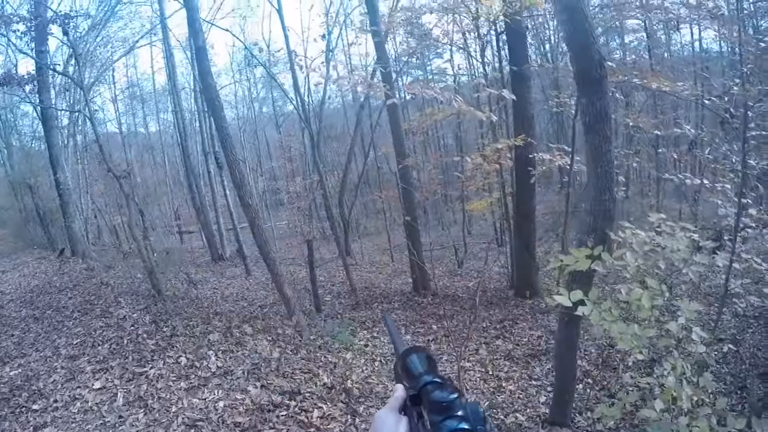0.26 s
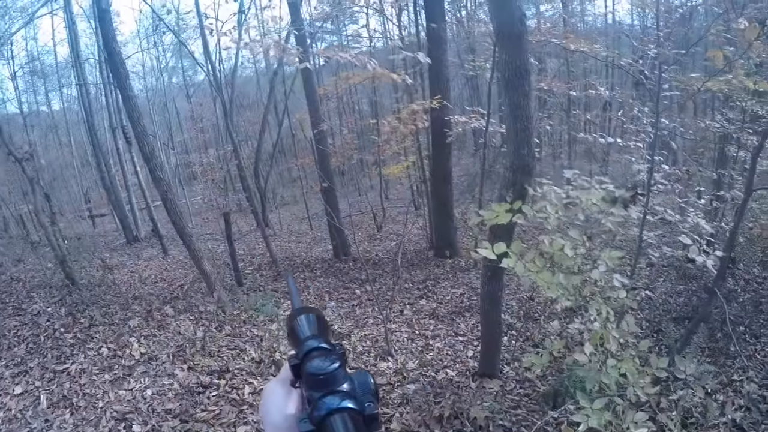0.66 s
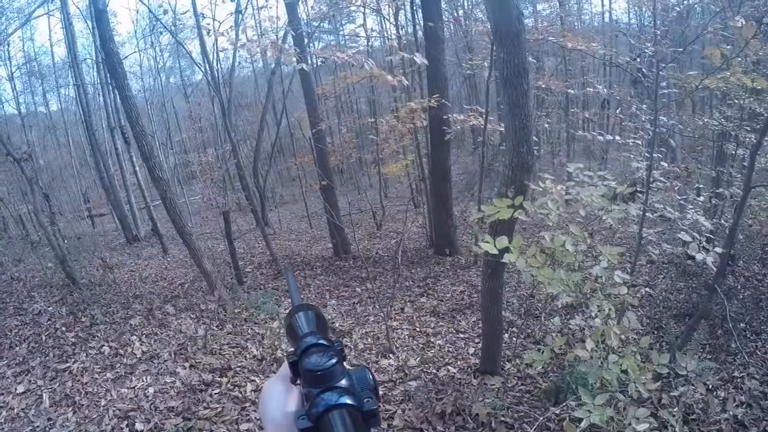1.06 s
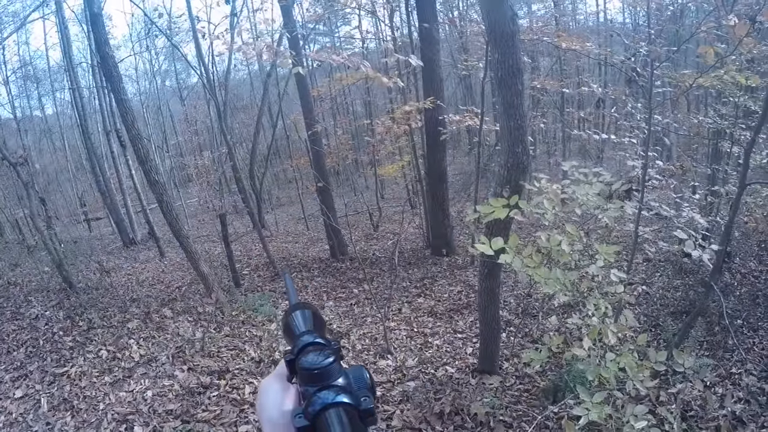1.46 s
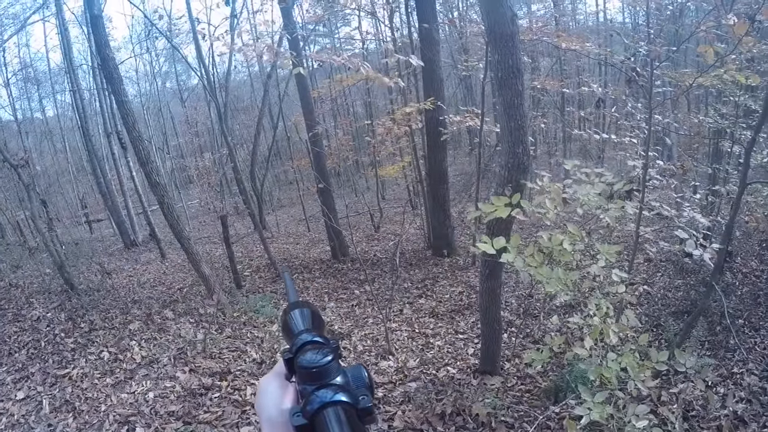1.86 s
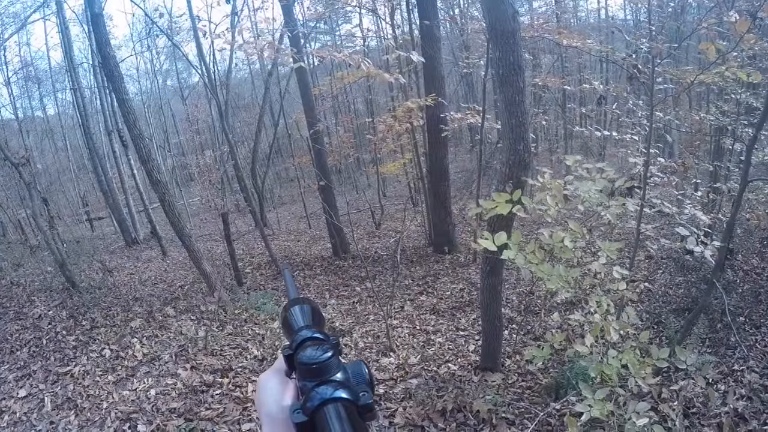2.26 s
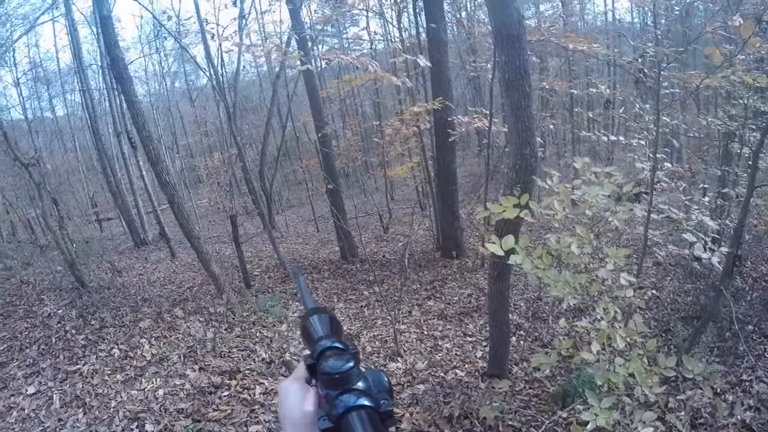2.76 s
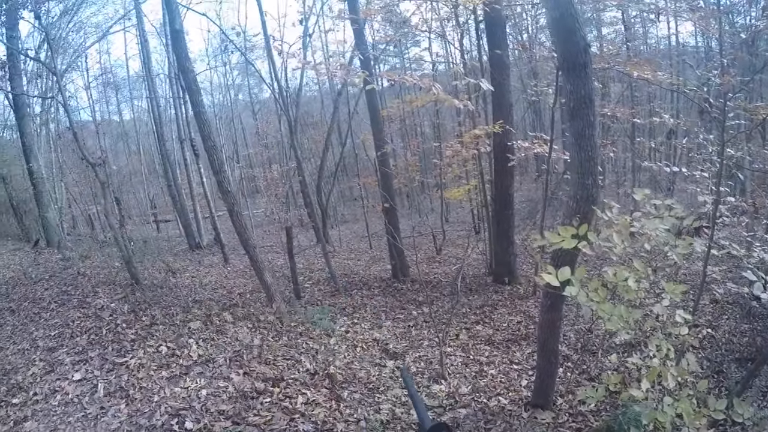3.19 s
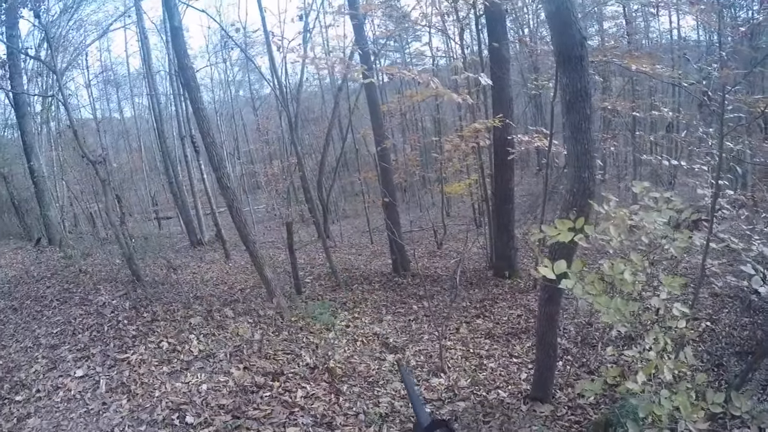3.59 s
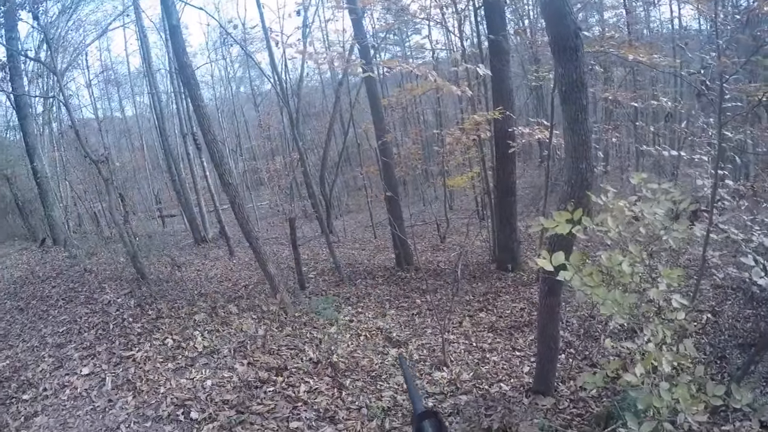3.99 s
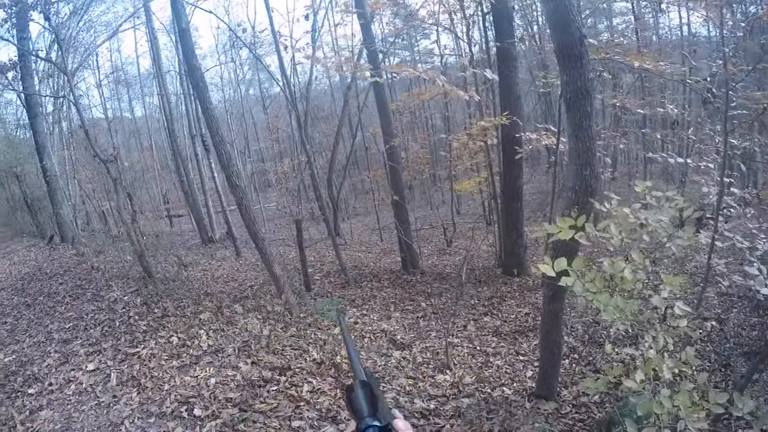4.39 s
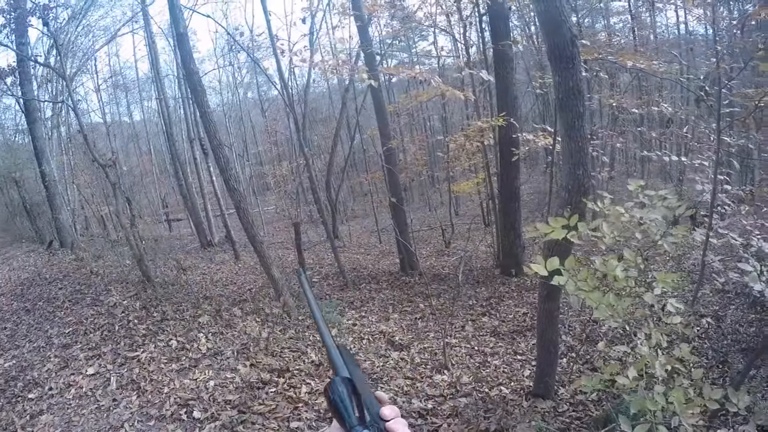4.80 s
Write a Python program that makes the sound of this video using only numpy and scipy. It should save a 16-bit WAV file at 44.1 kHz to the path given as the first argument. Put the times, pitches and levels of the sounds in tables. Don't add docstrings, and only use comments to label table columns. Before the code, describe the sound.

The first two seconds are quiet: low, lumpy wind rumble, a faint far drone and thin hiss, heard through a small boxed microphone worn close to the shooter. Sleeves rub softly and loose fittings tick; at 0.35 s a safety catch snaps crisply, with more cloth and a tick around 0.6 s. At about 2.37 s a single rifle shot bursts out, a hard, distorted crack and thump. Sharp echoes clatter off nearby trunks for a few tenths of a second, blending into a roll from distant slopes that dulls and fades beyond 3.7 s. The background ducks after the shot, then climbs back. A small tick at 3.7 s leads to the bolt handle clacking up at 3.86 s. The bolt scrapes back and strikes its stop at 4.11 s with a sleeve rustle. A brass case taps faintly at 4.22 and 4.28 s. Wind gusts and a clearer fitting tick come near 4.9 s.

```python
import sys
import numpy as np
from scipy import signal
from scipy.fft import rfft, irfft, next_fast_len
from scipy.io import wavfile

SR = 44100
rng = np.random.default_rng(int(sys.argv[2]) if len(sys.argv) > 2 else 0)


def int16_out(signal):
    q = np.round(np.clip(np.atleast_2d(signal).T, -1, 1) * 32767)
    wavfile.write(sys.argv[1], SR, q.astype(np.int16))


def undo_db(level):
    steps = np.asarray(level, float) / 20
    return 10 ** steps


N = 222616
TIME = np.arange(N) / SR
SHOT_S = 2.378
AFTER = np.maximum(TIME - SHOT_S, 0)


def rms_one(x):
    return x / np.sqrt(np.mean(x ** 2) + 1e-20)


def low_pass(x, hz, order):
    return signal.sosfilt(signal.butter(order, hz, fs=SR, output="sos"), x)


def level_curve(rows):
    s, db = np.transpose(rows)
    return np.interp(TIME, s, db)


def at_hz(points, hz, axis=1):
    return np.interp(np.log(hz), np.log(np.array(points)[:, 0]), np.array(points)[:, axis])


def drift(rate):
    r = np.exp(-80 * np.pi * rate / SR)
    noise = rng.standard_normal(N // 40 + 2002)
    slow = signal.lfilter([1], [1, -2 * r, r * r], noise)[2000:]
    return np.interp(np.arange(N) / 40, np.arange(len(slow)), rms_one(slow))


def bands(spectrum, low_hz, high_hz):
    size = next_fast_len(N + 8000)
    colour = undo_db(at_hz(spectrum, np.arange(1, size // 2 + 2) * SR / size))
    noise = irfft(rfft(rng.standard_normal((2, size))) * colour, size)
    edges = low_hz * 2 ** np.arange(0, np.log2(high_hz / low_hz), 1 / 3)
    for k, (low, high) in enumerate(zip(edges, edges[1:])):
        band = signal.butter(2, [low, high], "band", fs=SR, output="sos")
        yield np.sqrt(low * high), signal.sosfilt(band, noise[k % 2])[-N:]


def coloured(spectrum, low_hz, high_hz, patchy_db, rate):
    together = drift(rate / 4)
    total = 0
    for _, band in bands(spectrum, low_hz, high_hz):
        total = total + undo_db(patchy_db * (together + drift(rate))) * band
    return rms_one(total)


# frequency in Hz, width in Hz, level in dB.
PORT = [(423, 300, -17.5), (1010, 240, -5.5), (1680, 420, -5), (2900, 730, -1.5), (4200, 1600, -3.5),
        (5160, 290, -3.5), (6300, 440, -5), (10000, 2100, -18.5), (14300, 5700, -16.5)]


def bursts(rows, first_db, tail_db, tail_t60, own_db, own_width):
    out, t = np.zeros(N), np.arange(int(.2 * SR)) / SR
    for s, peak_db, t60, rise, tilt_db, own_hz in rows:
        decay = undo_db(-60 * t / t60) + undo_db(tail_db - 60 * t / tail_t60)
        spray = rng.standard_normal(len(t)) * (1 - np.exp(-t / rise)) * decay
        spray[round(rise * SR)] += undo_db(first_db) * np.exp(-rise / .0008)
        rung = 0
        for k, (hz, width_hz, level_db) in enumerate(PORT + [(own_hz, own_width * own_hz, own_db)]):
            r, w = np.exp(-np.pi * width_hz / SR), 2 * np.pi * hz / SR
            gain = undo_db(level_db + tilt_db * np.log2(hz / 4000))
            zeros, poles = [(1 - r * r) / 2, 0, (r * r - 1) / 2], [1, -2 * r * np.cos(w), r * r]
            rung = rung + (-1) ** k * gain * signal.lfilter(zeros, poles, spray)
        at = round(s * SR)
        out[at:at + len(t)] += (undo_db(peak_db) * rung / np.abs(rung).max())[:N - at]
    return out


def struck(rows, rise, tilt_db):
    return [(s, peak_db, t60, rise * t60, tilt_db, hz) for s, peak_db, t60, hz in rows]


def metal(rows, tilt_db):
    contacts = struck(rows, .03, tilt_db)
    return bursts(contacts, first_db=15, tail_db=-42.5, tail_t60=.23, own_db=7.5, own_width=.16)


# frequency in Hz, density in dB per Hz.
WIND = [(7.1, -32), (12, 2.5), (33, 1.5), (68, -12.5), (98, -16), (134, -30.5), (200, -28.5), (260, -51.5),
        (440, -120)]
# time in seconds, level in dB.
GUSTS = [(0, -54), (.4, -56.5), (.6, -50), (1.1, -55), (1.7, -57), (2.1, -55), (2.25, -46.5), (2.36, -52.5),
         (2.9, -57), (3.3, -57), (3.65, -47.5), (4.1, -49), (4.27, -45.5), (4.5, -53.5), (4.85, -41),
         (5.05, -46.5)]


def wind():
    return undo_db(level_curve(GUSTS)) * coloured(WIND, 14, 220, patchy_db=-.56, rate=6.9)


# frequency in Hz, density in dB per Hz.
DRONE = [(59, -31), (100, 0.5), (215, -1), (347, -0.5), (435, -3.5), (479, -2.5), (550, -11), (800, -23),
         (1040, -50.5), (1760, -120)]
# time in seconds, level in dB.
SWELL = [(0, -59.5), (.6, -63.5), (1.0, -59.5), (1.3, -66), (1.7, -63), (2.3, -64), (3.6, -58.5),
         (5.05, -63)]


def drone():
    return undo_db(level_curve(SWELL)) * coloured(DRONE, 100, 900, patchy_db=1.2, rate=5.0)


# frequency in Hz, density in dB per Hz.
HISS = [(450, -30), (600, -9), (1200, -12.5), (2100, -13), (2700, -8.5), (3400, -12.5), (5300, -14.5),
        (6700, -17.5), (7600, -20.5), (12000, -25), (15200, -28), (15500, -62)]


def hiss():
    return undo_db(-63) * coloured(HISS, 400, 19000, patchy_db=.53, rate=14.0)


def background():
    duck_db, dive_s, climb_s = 16, .14, .59
    recovery = np.exp(-(np.maximum(AFTER - dive_s, 0) / climb_s) ** 2)
    gain_db = -duck_db * np.minimum(AFTER / dive_s, 1) * recovery
    return undo_db(gain_db) * (wind() + drone() + hiss())


# peak time in seconds, level in dB, swell in dB per second, fade in dB per second.
CLOTH = [
    (0, -63, 100, 198),
    (.13, -63, 43, 77),
    (.515, -62.5, 94, 57),
    (.6, -61.5, 61, 150),
    (4.13, -55, 904, 94.5),
    (4.35, -65, 30, 37),
    (4.93, -65.5, 68.5, 8),
]


def cloth():
    level = 0
    for s, db, swell, fade in CLOTH:
        level = level + undo_db(db - np.where(TIME < s, swell * (s - TIME), fade * (TIME - s)))
    colour = [(500, 3.5), (1200, -5), (2300, -2), (3600, -4), (5200, -2), (6600, -5.5), (8000, -16.5),
              (15200, -15.5), (15500, -48.5)]
    return level * undo_db(.9 * drift(80)) * coloured(colour, 500, 16500, patchy_db=.5, rate=20.0)


# start in seconds, peak in dB, t60 in seconds, own ring in Hz.
TICKS = [(.094, -47.5, .02, 2290), (.1826, -39.5, 0.0094, 5760), (.197, -46, .016, 6000),
         (.5991, -39, 0.0068, 2520), (.893, -55.5, .015, 9500), (3.7031, -29, 0.02, 5295),
         (4.0029, -37, 0.035, 2240), (4.5482, -39.5, .02, 5140), (4.9083, -23.5, 0.01302, 4300),
         (4.9105, -38, 0.075, 4080), (4.922, -34, 0.02, 6060)]


def loose_ticks():
    return metal(TICKS, tilt_db=-2.5)


# start in seconds, peak in dB, t60 in seconds, own ring in Hz.
CATCH = [
    (.3185, -35, 0.0128, 5650),
    (.3496, -3, 0.0065, 6300),
    (.3506, -18, 0.013, 4750),
    (.3585, -34, 0.004, 7200),
]


def safety_catch():
    return metal(CATCH, tilt_db=3.5)


# start in seconds, peak in dB, pitch in Hz, t60 in seconds.
KNOCKS = [(.32, -46, 150, .04), (.35, -40, 420, .025), (2.3685, -15, 250, .02), (2.3803, -14, 420, .04),
          (2.3817, -12, 285, .035), (2.384, -22, 120, .12), (2.3885, -18, 230, .05), (2.407, -17, 185, .05),
          (2.472, -24, 400, .03), (2.473, -26, 190, .04), (3.858, -21, 430, .045), (3.862, -33, 150, .06),
          (3.868, -29, 70, .095), (4.11, -25, 390, .05), (4.111, -29, 140, .07), (4.2245, -35, 5300, .019),
          (4.277, -35, 5300, .035)]


def knocks():
    out = np.zeros(N)
    for s, peak_db, hz, t60 in KNOCKS:
        t = np.maximum(TIME - s, 0)
        out += undo_db(peak_db - 60 * t / t60) * np.sin(2 * np.pi * hz * t)
    return out


# start in seconds, peak in dB, t60 in seconds, own ring in Hz.
CRACKS = [
    (2.364, -22, .04, 3000),
    (2.3663, -8, .02, 7000),
    (2.3679, 0, .012, 2800),
    (2.3704, 9, .03, 6200),
    (2.3776, 10, .005, 6000),
    (2.3795, -5, .05, 5300),
]
# time in seconds, gain in dB.
DEAF = [(2.3729, 0), (2.3736, -20), (2.3775, -20), (2.3776, 0)]


def crack():
    rows = struck(CRACKS, .013, 0)
    jet = bursts(rows, first_db=10, tail_db=-60, tail_t60=.05, own_db=0, own_width=.3)
    return undo_db(level_curve(DEAF)) * jet


# start in seconds, height in dB, time to zero in seconds, decay in seconds,
# time in seconds when the ground bounce cancels it.
BLAST = (2.3728, 10, .0023, .004, 2.3795)


def blast():
    s, height_db, zero_s, decay_s, bounce_s = BLAST
    t = np.maximum(TIME - s, 0)
    before_bounce = (t > 0) * (t < bounce_s - s)
    wave = undo_db(height_db) * before_bounce * (1 - t / zero_s) * np.exp(-t / decay_s)
    bounce = undo_db(-4) * (t >= bounce_s - s) * np.exp(-np.abs(t + s - bounce_s) / .0015)
    return -low_pass(wave + bounce, 1200, order=2)


# frequency in Hz, starting density in dB per Hz, t60 in seconds.
NEAR = [(60, -9, 0.24), (150, -5.5, 0.18), (330, -5, .33), (799, -13.5, .42), (1800, -4, 0.57),
        (3000, -1.5, 0.66), (4300, 3, 0.28), (6200, -2, .31), (7656, -16.5, 0.65), (10000, -10, 0.16),
        (15200, -16.5, 0.39), (15700, -54, .25)]


def near_wood():
    grain_db = 2.0 * drift(90)
    near = 0
    for hz, band in bands(NEAR, 50, 19000):
        near = near + undo_db(grain_db - 60 * AFTER / at_hz(NEAR, hz, axis=2)) * band
    return undo_db(-12.5) * near * np.clip(AFTER / .0036, 0, 1)


# frequency in Hz, density in dB per Hz.
ROLL_COLOUR = [(120, -30), (200, -18), (330, 5), (700, 0.5), (1300, 2), (2600, 2), (3150, -3.5),
               (3450, -11), (5200, -18), (6500, -31), (9000, -57.5)]


def far_wood():
    air_db_per_s, last_slope_s = 12, 3.746
    far = 0
    for hz, band in bands(ROLL_COLOUR, 100, 10500):
        air_db = air_db_per_s * (hz / 4000) ** 2 * (AFTER - .73)
        far = far + undo_db(.8 * drift(45) - air_db) * band
    roll_db = -43 + 13 * np.exp(-AFTER / .38) - 2 * AFTER
    roll_db = roll_db - 9.5 * np.maximum(AFTER + SHOT_S - last_slope_s, 0)
    roll_db = roll_db + 1.5 * drift(7)
    return undo_db(roll_db) * np.clip(AFTER / .098, 0, 1) * rms_one(far)


# frequency in Hz, density in dB per Hz.
BOOM = [(40, -5.5), (80, -2), (160, -9), (300, 1.5), (450, -15), (700, -26.5)]


def slope_boom():
    level = undo_db(-39 - 60 * AFTER / .91) * (AFTER > 0)
    return level * coloured(BOOM, 40, 800, patchy_db=2.0, rate=47.0)


# start in seconds, peak in dB, own ring in Hz.
ECHOES = [(2.3893, -5, 1560), (2.3907, -3, 5150), (2.3997, -9, 4000), (2.4024, -4, 3440), (2.4052, 0, 4200),
          (2.4285, -11, 4400), (2.4306, -9, 4400), (2.4368, -9, 3540), (2.4396, -2, 4300),
          (2.456, -16, 2520), (2.4718, -15, 3580), (2.4758, -15, 3600), (2.4826, -13, 3300),
          (2.4988, -15, 5800), (2.5003, -14, 2390), (2.524, -21, 2000), (2.972, -33, 1700),
          (3.0391, -41, 2000), (3.1109, -38, 2200), (3.25, -39, 994)]


def trunks():
    rows = []
    for s, db, hz in ECHOES:
        delay = s - SHOT_S
        t60 = .007 - .0009 * min(db, 0)
        rise = .012 * t60 + .003 * delay
        rows.append((s, db, t60, rise, -.5 - 14 * delay, hz))
    echoes = bursts(rows, first_db=21, tail_db=-24.0, tail_t60=.09, own_db=0, own_width=.4)
    bright = undo_db(-60 * AFTER / .25)
    dull = low_pass(low_pass(echoes[::-1], 7200, order=4)[::-1], 7200, order=4)
    return dull + bright * (echoes - dull)


# start in seconds, peak in dB, t60 in seconds, own ring in Hz.
LIFT = [
    (3.8345, -33.5, 0.025, 4930),
    (3.8548, -24, .04, 3515),
    (3.8574, -3.5, 0.0081, 6300),
    (3.8586, -3, 0.012, 4720),
    (3.86, -2.5, 0.0078, 3000),
    (3.8685, -34.5, 0.051, 4960),
]


def bolt_lift():
    return metal(LIFT, tilt_db=-.7)


# start in seconds, peak in dB, t60 in seconds, own ring in Hz.
DRAW = [(4.0533, -32, .012, 3000), (4.061, -38, .025, 4430), (4.0667, -23, .05, 5190),
        (4.0755, -17, .015, 4900), (4.0803, -20, .02, 4800), (4.0895, -29, .03, 4400),
        (4.0945, -25, .02, 4620), (4.0968, -11, .012, 4830), (4.0985, -18, .03, 5290),
        (4.1025, -24, .03, 7500), (4.1045, -13, .022, 6200), (4.1096, 3, .012, 6200),
        (4.111, -2, .015, 6000), (4.1142, -14, .04, 5600), (4.1247, -17, .018, 6200)]


def bolt_draw():
    return metal(DRAW, tilt_db=-2.4)


# start in seconds, peak in dB, t60 in seconds, own ring in Hz.
CASE = [
    (4.2209, -21.5, 0.012, 5630),
    (4.2242, -42, 0.016, 5400),
    (4.2758, -22, 0.0066, 5660),
    (4.2775, -36, .03, 3000),
]


def brass_case():
    return metal(CASE, tilt_db=-3.5)


def scene():
    before = background() + cloth() + loose_ticks() + safety_catch() + knocks()
    shot = crack() + blast() + near_wood() + far_wood() + slope_boom() + trunks()
    reload = bolt_lift() + bolt_draw() + brass_case()
    return (before + shot + reload)[None]


def top_cut(x):
    return signal.sosfilt(signal.butter(12, 16510, fs=SR, output="sos"), x)


def record(dry):
    clipped = dry / (1 + np.abs(dry / .9) ** 6) ** (1 / 6)
    top = signal.cheby2(10, 40, 16600, fs=SR, output="sos")
    return top_cut(signal.sosfilt(top, clipped))


dry = scene()
out = record(dry)
int16_out(out)
```